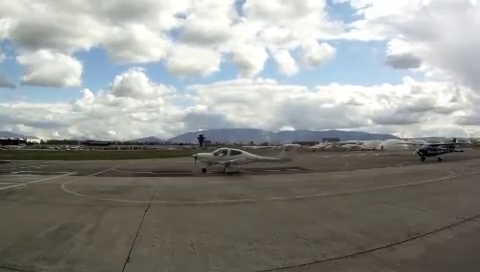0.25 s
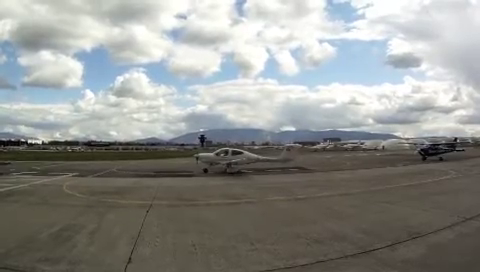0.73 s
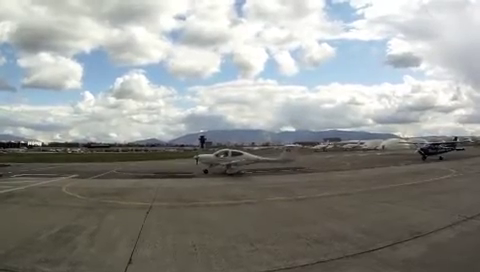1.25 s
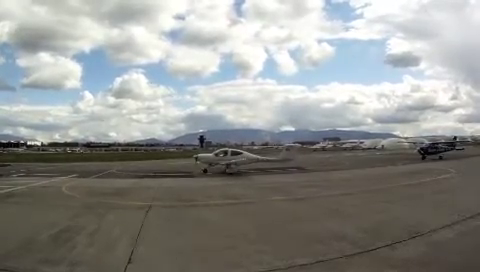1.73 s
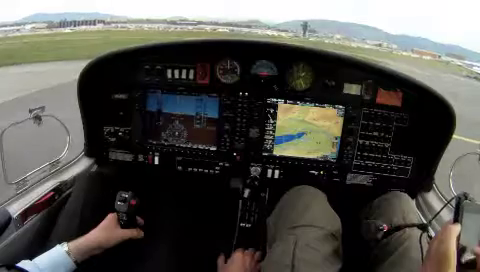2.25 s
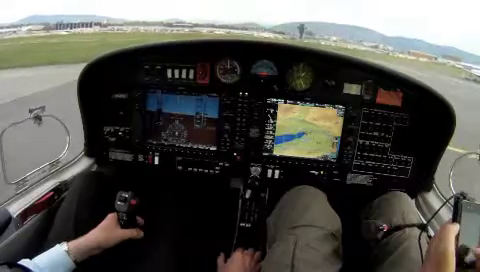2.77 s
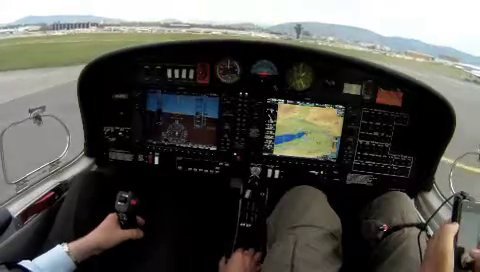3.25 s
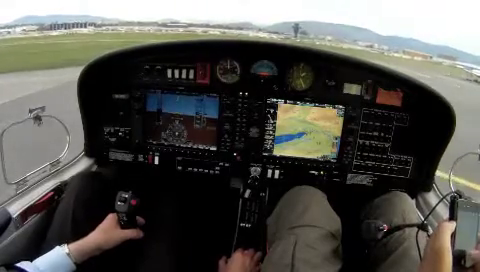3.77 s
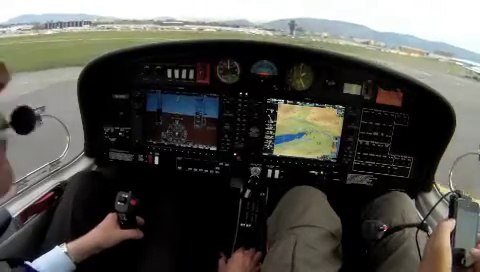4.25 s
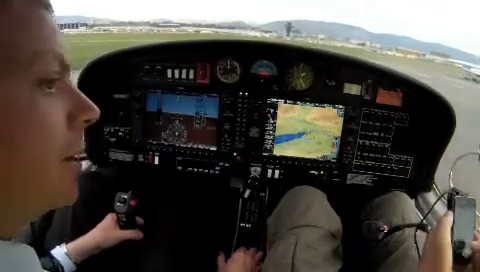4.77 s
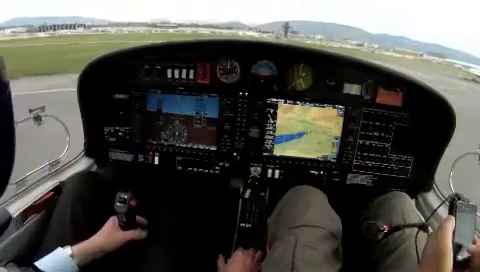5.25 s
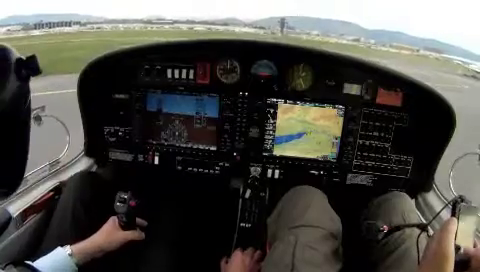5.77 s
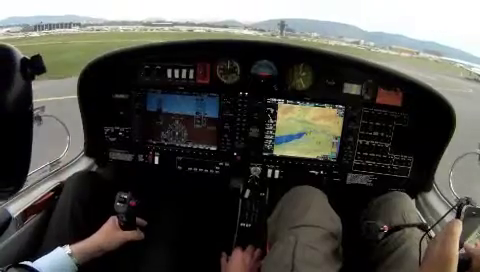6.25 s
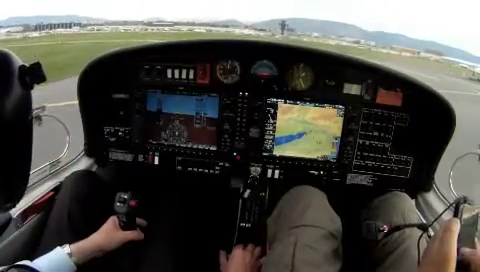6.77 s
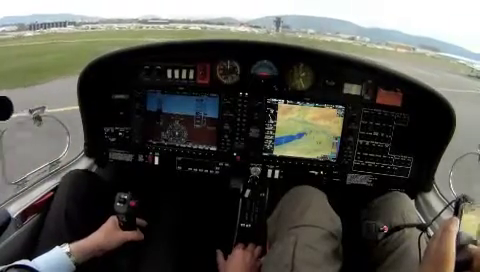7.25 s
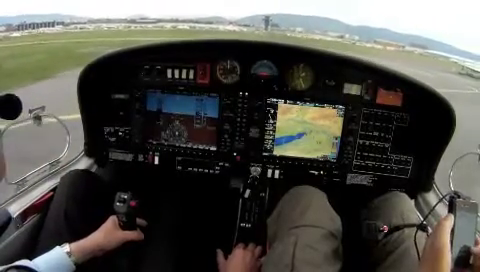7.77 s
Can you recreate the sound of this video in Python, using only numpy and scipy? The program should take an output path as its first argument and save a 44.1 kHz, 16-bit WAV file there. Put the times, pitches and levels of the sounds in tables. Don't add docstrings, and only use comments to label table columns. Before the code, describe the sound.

A light aircraft idles loudly outside with thumping exhaust and hissing propeller wash, then cuts to a deep cabin drone that smooths as throttle opens.

```python
import sys
import numpy as np
from scipy import signal
from scipy.fft import rfft, irfft, next_fast_len
from scipy.io import wavfile
from scipy.ndimage import map_coordinates

SR = 44100
rng = np.random.default_rng(int(sys.argv[2]) if len(sys.argv) > 2 else 0)


def boost_factor(decibels):
    exponent = np.asarray(decibels, float) / 20
    return 10 ** exponent


def to_wav(s):
    ch = np.atleast_2d(s).T
    pcm = np.round(np.clip(ch, -1, 1) * 32767)
    wavfile.write(sys.argv[1], SR, pcm.astype(np.int16))


N = 353665


def unit(x):
    return x / np.sqrt(np.mean(x ** 2) + 1e-20)


def curves(rows):
    time_s, *columns = np.transpose(rows)
    return [np.interp(np.arange(N) / SR, time_s, column) for column in columns]


def wobble(rate_hz, size=N):
    coarse = np.arange(0, size + 128, 128)
    knots = rng.standard_normal(int(N * rate_hz / SR) + 4)
    return np.interp(np.arange(size), coarse, map_coordinates(knots, [coarse * rate_hz / SR]))


def step(x, width):
    return .5 + .5 * np.tanh(x / width)


def tone(turns, rms_db):
    return boost_factor(rms_db + 3) * np.cos(2 * np.pi * turns)


def filtered(x, response):
    size = next_fast_len(N + SR // 2)
    return irfft(rfft(x, size) * response(np.fft.rfftfreq(size, 1 / SR)), size)[..., :N]


def resonance(f, centre_hz, width_hz):
    damping = 1j * f * width_hz
    return damping / (centre_hz ** 2 - f * f + damping)


def ringing(x, modes):
    def body(f):
        return sum((-1) ** k * boost_factor(db) * resonance(f, hz, width_hz)
                   for k, (hz, width_hz, db) in enumerate(modes))
    return unit(filtered(x, body))


def answer_db(modes, tone_hz):
    power = sum(boost_factor(2 * db) / (1 + (2 * (tone_hz - hz) / width_hz) ** 4) for hz, width_hz, db in modes)
    return 10 * np.log10(power)


def coloured(x, spectrum):
    hz, db = np.transpose(spectrum)
    return unit(filtered(x, lambda f: boost_factor(np.interp(np.log(f + 1), np.log(hz + 1), db))))


def pulses(turns, pattern, jitter_s, scatter):
    at = np.flatnonzero(np.diff(np.floor(turns)))
    chance = rng.standard_normal((len(at), 2))
    size = np.resize(pattern, len(at)) + scatter * chance[:, 0]
    at = np.clip(at + np.round(jitter_s * SR * chance[:, 1]).astype(int), 0, N - 1)
    return unit(np.bincount(at, size, N))


def gated(turns, depth):
    return unit(np.exp(depth * np.cos(2 * np.pi * turns)) * rng.standard_normal(N))


def clicks(rows):
    t, x = np.arange(400) / SR, np.zeros(N + 400)
    for at_s, db in rows:
        x[round(at_s * SR):][:400] += boost_factor(db - 60 * t / .014) * rng.standard_normal(400)
    return x[:N]


# (multiple of firing rate, level [dB])
PIPE_DB = [(1, -27), (2, -28.5), (3, -27), (4, -33), (5, -48), (6, -46), (7, -47.5), (8, -46)]


def exhaust(firing):
    lag_turns = .32
    return sum(tone(k * firing - lag_turns * (k - 1), db + 1.1 * wobble(7)) for k, db in PIPE_DB)


# (time [s], peak [dB])
SNAPS_DB = [
    (0.8495, -26),
    (0.9557, -23),
    (1.1114, -22),
    (1.2456, -26),
    (1.6432, -26),
]


def exhaust_snaps():
    return boost_factor(11) * filtered(clicks(SNAPS_DB), lambda f: 1 / (1 + 1j * f / 4000))


# (frequency [Hz], level [dB])
BLADE_OVERTONES = [(45, -3), (90, -4), (180, 3), (270, -1.5), (400, -5), (480, -4.5), (620, 2.5), (720, -7),
                   (860, -3.5), (1000, -11.5), (1200, -5), (1500, -16), (2200, -27.5)]


def propeller(blades, turned):
    low_db = -36 + 1.2 * wobble(2.06)
    bright_db = -37 - 5 * turned
    hz, db = np.transpose(BLADE_OVERTONES)
    heard, x = round(FADE_GAINS[1][0] * SR), np.zeros(N)
    for k in range(1, 46):
        base_db = low_db if k < 9 else np.asarray(bright_db)
        level_db = base_db[:heard] + np.interp(k * 45, hz, db) + 3 * wobble(7, size=heard)
        smear_turns = .17 * rng.standard_normal() + .13 * wobble(10, size=heard)
        x[:heard] -= tone(k * blades[:heard] + smear_turns, level_db)
    return x


# (frequency [Hz], level [dB per Hz])
WASH_SPECTRUM = [(12, -35), (20, -13.5), (60, -12.5), (160, -12), (255, -11.5), (440, -17.5), (615, -15),
                 (900, -17.5), (1200, -17), (2280, -20), (3750, -27.5), (4760, -27), (5900, -31.5),
                 (7600, -83)]


def wash(blades, turned):
    air = gated(blades, depth=.2) + .22 * pulses(blades, [0], .0005, scatter=1)
    level_db = -26 - 1.1 * turned + .6 * wobble(12) + .9 * wobble(70)
    return boost_factor(level_db) * coloured(air, WASH_SPECTRUM)


# (time [s], firing rate [Hz], blade pass rate [Hz])
APRON_RATES = [
    (0, 50.41, 45.3),
    (.4, 50.85, 45.35),
    (.8, 50.75, 45.25),
    (1.2, 50.49, 44.97),
    (1.6, 50.34, 44.85),
    (2.03, 50.8, 45),
]


def apron():
    firing, blades = np.cumsum(curves(APRON_RATES), axis=1) / SR
    blades = blades - .32
    turn_s, turn_takes_s = 1.28, .056
    turned = step(np.arange(N) / SR - turn_s, turn_takes_s)
    return exhaust(firing) + wash(blades, turned) + propeller(blades, turned) + exhaust_snaps()


# (time [s], firing rate [Hz])
CABIN_RATE = [
    (2.05, 63.42),
    (6.1, 63.3),
    (6.4, 65.15),
    (6.8, 66.73),
    (7, 68.74),
    (7.2, 69.42),
    (7.4, 69.85),
    (7.8, 70),
    (8.02, 70.4),
]


def throttle():
    firing_hz, = curves(CABIN_RATE)
    idle_hz, load_span_hz, smooth_hz = 63.6, 1.63, 67.6
    load = 1 - np.exp(-np.maximum(firing_hz - idle_hz, 0) / load_span_hz)
    return firing_hz, load, step(firing_hz - smooth_hz, .97)


def boom_level_db(load):
    return -22 + 8.5 * load


def boom(firing):
    _, load, smooth = throttle()
    gear_ratio = .8879
    blade_db = -30 - 7 * smooth
    firing_tone = tone(firing, boom_level_db(load) + .8 * wobble(12))
    return -firing_tone - tone(gear_ratio * firing, blade_db + wobble(5))


# (multiple of firing rate, level [dB])
HUM_TONES = [(.296, -37), (1.25, -11.5), (1.776, -12.5), (2, -28), (3, -25.5), (4, -30), (5, -33),
             (5.75, -43.5), (6, -35.5), (6.25, -49), (9.5, -32), (10.5, -39.5)]


def hum(firing):
    _, load, smooth = throttle()
    load_db = np.minimum(0, -1.3 * (boom_level_db(load) + 15.5)) - 4 * smooth
    x = np.zeros(N)
    for multiple, db in HUM_TONES:
        turns = multiple * firing + .22 + .037 * wobble(2.2)
        x += tone(turns, db - 23 + load_db + 2.23 * wobble(5))
    return x


# (frequency [Hz], width [Hz], level [dB])
AIR_MODES = [(79.4, 16, -0.5), (99.9, 13.8, 2), (110.5, 12.5, -0.5), (147, 48, -17.5), (264, 18, -22.5)]


def thuds(firing):
    _, _, smooth = throttle()
    x = ringing(pulses(firing + .2, [0], .00064, scatter=1), AIR_MODES)
    x = filtered(x, lambda f: 1 / (1 + (f / 175) ** 4))
    return boost_factor(-26.5 - 8 * smooth + wobble(3)) * x


# (frequency [Hz], width [Hz], level [dB])
PANEL_MODES = [(384.5, 21, -13.5), (558.5, 45, -4), (640, 33, -1.5), (673, 34.5, -1), (759, 47.6, -4.5),
               (823, 36, -4.5), (917, 32, -6.5), (956.5, 35, -6)]
# (frequency [Hz], width [Hz], level [dB])
FITTING_MODES = [(1273, 80, -3), (1592, 79, -1.5), (1873, 64, 0), (2140, 68, -8), (2305, 92, -10),
                 (2910, 210, -13.5), (3340, 71, -16)]


def clatter(firing):
    _, load, smooth = throttle()
    knock_db = -43 + 4 * load * (1 - smooth) + .5 * smooth
    rattle_db = -49.5 - 4 * smooth
    knock = pulses(firing, [1, .75, 1.05, .7], .00003, scatter=.15)
    valves = pulses(4 * firing + .3, rng.standard_normal(16), .00003, scatter=.3)
    pump = pulses(4 * firing + .6, rng.standard_normal(8), .00003, scatter=.3)
    blows = unit(boost_factor(-5) * knock + valves + pump)
    cycle_db = 1.6 * np.cos(np.pi * firing / 2)
    panel_drive = boost_factor(-12 * smooth) * blows + boost_factor(-3) * gated(firing / 2, depth=.65)
    fitting_drive = blows + boost_factor(-2.5) * gated(firing, depth=.21)
    panels = boost_factor(knock_db + cycle_db) * ringing(panel_drive, PANEL_MODES)
    return panels + boost_factor(rattle_db) * ringing(fitting_drive, FITTING_MODES)


# (frequency [Hz], width [Hz], level [dB])
GEAR_CASE_MODES = [(2790, 110, -66), (2925, 80, -58.5), (3010, 50, -69)]


def whines(firing):
    firing_hz, load, _ = throttle()
    pump, gear, alternator = 29, 43.5, 54.43
    levels_db = [(pump, -55.5 - 25 * step(firing_hz - 67.2, .4)),
                 (gear, answer_db(GEAR_CASE_MODES, gear * firing_hz)),
                 (alternator, -76 - 14 * load)]
    return sum(tone(k * firing + .2 * wobble(25), db + 2.2 * wobble(30)) for k, db in levels_db)


# (frequency [Hz], width [Hz], level [dB])
SKIN_MODES = [(570, 24, -62), (626, 24, -48.5), (665, 30, -58), (722, 30, -48), (826, 46, -50)]


def skin(firing):
    firing_hz, _, _ = throttle()
    x = np.zeros(N)
    for k in range(9, 14):
        turns = k * firing + rng.random() + .06 * wobble(8)
        x += tone(turns, answer_db(SKIN_MODES, k * firing_hz) + 2.2 * wobble(10))
    return x


# (time [s], peak [dB], ring [dB])
TRIM_TICKS = [(2.5323, -51, 4), (3.1659, -53, 6), (4.2993, -52, 7), (5.7066, -57, 1), (6.3831, -54, 2),
              (6.444, -53, -2), (6.6031, -54, -2), (6.6495, -52, 4), (6.6625, -49, 5), (6.7403, -49, -2),
              (6.7832, -51, 5), (6.883, -55, 0), (6.9628, -54, 2), (7.0366, -54, -5), (7.086, -55, -4),
              (7.1713, -55, 5), (7.2312, -55, 1), (7.5185, -50, -6), (7.6472, -54, -2), (7.7475, -54, -1),
              (7.8622, -54, -1), (7.8897, -55, -4), (7.9045, -56, -2), (8.004, -56, -2)]


def ticks(firing):
    _, load, _ = throttle()
    swings = unit(np.abs(pulses(2 * firing, [0], .001, scatter=1)) ** 2)
    chatter = boost_factor(2.5 * boom_level_db(load) - 32) * swings
    dry_ticks = clicks([(s, db + 9 - .4 * ring_db) for s, db, ring_db in TRIM_TICKS])
    rung = clicks([(s + .0012, db + 1.4 * ring_db + 19) for s, db, ring_db in TRIM_TICKS])
    trim = filtered(dry_ticks + chatter, lambda f: resonance(f, 3500, 3500))
    return trim + filtered(rung, lambda f: resonance(f, 3000, 450))


# (frequency [Hz], level [dB per Hz])
HUSH_SPECTRUM = [(8.8, -44), (15, -20), (43, -9.5), (78, -9.5), (223, -21.5), (472, -35.5), (819, -36.5),
                 (1420, -42), (1870, -36), (2010, -41), (5900, -65), (7670, -106), (13000, -120)]


def hush():
    return boost_factor(-36 + .81 * wobble(6.4)) * coloured(rng.standard_normal(N), HUSH_SPECTRUM)


def cabin():
    firing = np.cumsum(throttle()[0] + .0997 * wobble(2)) / SR
    low = boom(firing) + hum(firing) + thuds(firing)
    return low + clatter(firing) + whines(firing) + skin(firing) + ticks(firing) + hush()


# (time [s], apron gain, cabin gain)
FADE_GAINS = [
    (1.96, 0.84, 0.12),
    (2.032, 0, 0.031),
    (2.036, 0.0076, 0.062),
    (2.11, 0.013, 1),
]


def scene():
    outside, inside = curves(FADE_GAINS)
    return (outside * apron() + inside * cabin())[None]


def top_cut(x):
    return signal.sosfilt(signal.butter(12, 15720, fs=SR, output="sos"), x)


def record(dry):
    ceiling, hold_hz = .46, 12000

    def guard(f):
        low_pass = (f < hold_hz / 2) / (1 + (f / 5700) ** 24)
        return low_pass * f * f / (f * f + 18 ** 2)

    limited = dry / (1 + (dry / ceiling) ** 6) ** (1 / 6)
    guarded = filtered(limited, guard)
    sampled = guarded * (1 + 2 * np.cos(2 * np.pi * hold_hz * np.arange(N) / SR))
    held = filtered(sampled, lambda f: np.sinc(f / hold_hz) * (f < 15400))
    return top_cut(held)


dry = scene()
out = record(dry)
to_wav(out)
```